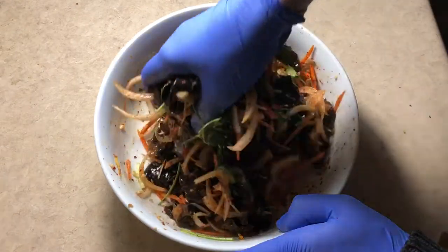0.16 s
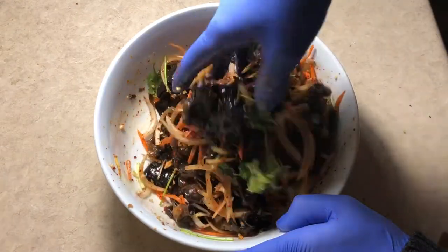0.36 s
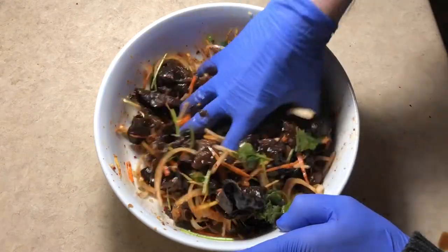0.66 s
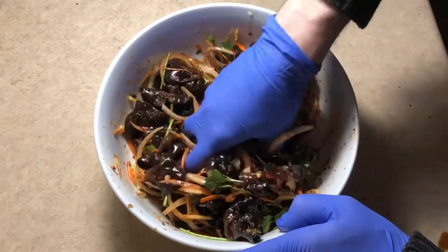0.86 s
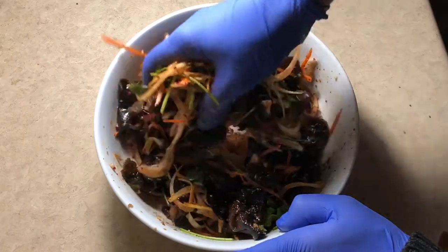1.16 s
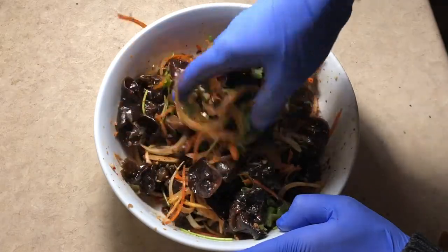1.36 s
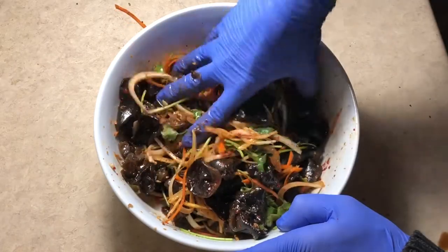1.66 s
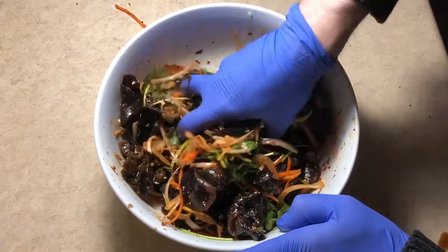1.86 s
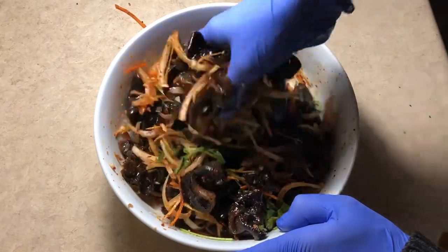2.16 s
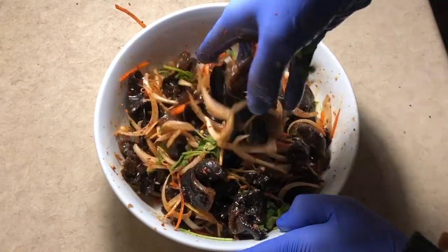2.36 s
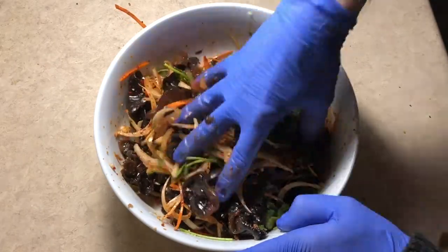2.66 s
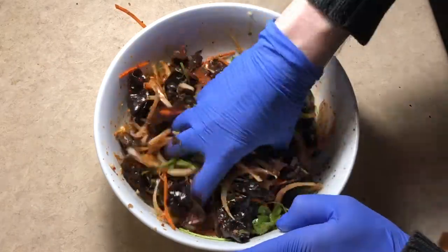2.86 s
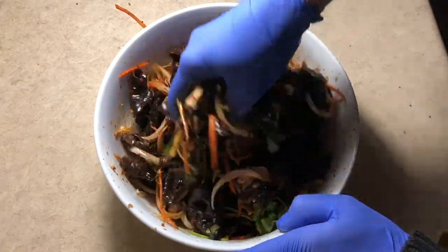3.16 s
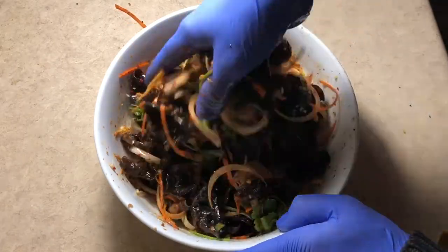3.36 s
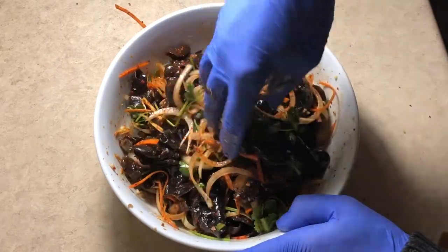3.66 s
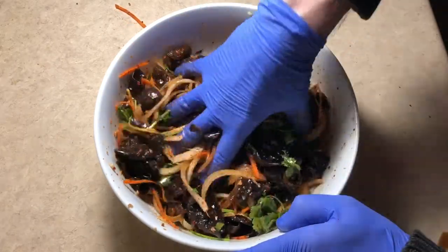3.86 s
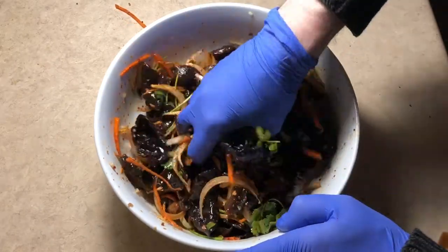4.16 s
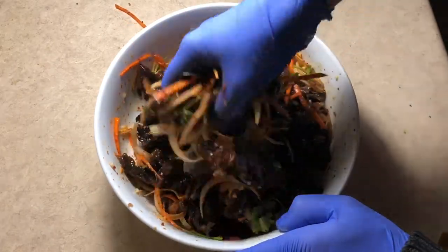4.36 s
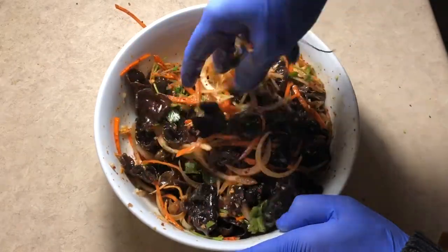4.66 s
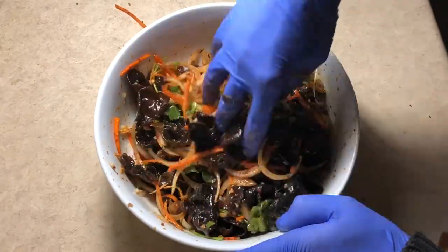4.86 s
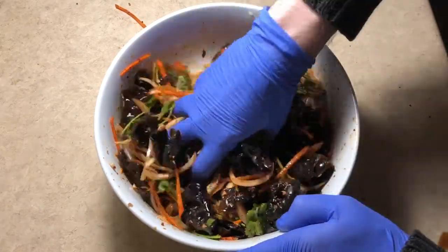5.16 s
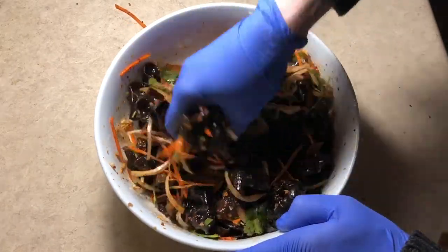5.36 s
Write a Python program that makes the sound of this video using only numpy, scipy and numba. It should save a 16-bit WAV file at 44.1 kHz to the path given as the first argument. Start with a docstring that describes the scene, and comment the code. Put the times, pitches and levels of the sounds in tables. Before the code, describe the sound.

Close, wet smacking and rustling of dressed salad being mixed by hand, with dull counter bumps and light ceramic taps.

```python
"""On a kitchen counter, a gloved hand squeezes and tosses a wet salad in a ceramic bowl, heard up close.
Dressing smacks and crackles as its films burst, leaves rustle, and the glove peels off them with ticks.
The push of the hand rumbles and thuds through the counter, and pieces tap the bowl into short rings.
One piece slaps down on the counter and a finger squeaks once on the glaze.
Underneath, slow air pressure sways in a quiet room."""
import sys
import numpy as np
from scipy import signal
from scipy.fft import rfft, irfft
from scipy.io import wavfile
from scipy.ndimage import uniform_filter1d
from numba import njit

SR = 44100
rng = np.random.default_rng(int(sys.argv[2]) if len(sys.argv) > 2 else 0)


def log_audio(samples):
    """Write samples as a 16-bit WAV file to the path given in sys.argv[1]."""
    # one column per channel
    frames = np.atleast_2d(samples).T
    # limit to full scale, then quantise
    limited = np.clip(frames, -1, 1)
    pcm = np.round(limited * 32767).astype(np.int16)
    wavfile.write(sys.argv[1], SR, pcm)


N = 242550
T = np.arange(N) / SR


def amp(db):
    """Turn decibels into a number to multiply by."""
    return 10 ** (np.asarray(db, float) / 20)


def unit(x):
    """Scale a sound so its average level (rms) is 1."""
    return x / np.sqrt(np.mean(x ** 2))


def curves(table):
    """Join the rows of a table with straight lines in time, giving one curve per value column."""
    times, *columns = np.transpose(table)
    return [np.interp(T, times, column) for column in columns]


def shaped_noise(points):
    """Noise whose balance of low and high follows (pitch [Hz], level [dB]) points."""
    hz, db = np.transpose(points)
    all_hz = np.arange(N // 2 + 1) * SR / N + 0.00089  # the tiny offset avoids log(0)
    gain = amp(np.interp(np.log(all_hz), np.log(hz), db, left=-90))
    return unit(irfft(rfft(rng.standard_normal(N)) * gain, N))


def band(x, lo_hz, hi_hz):
    """Keep the part of a sound between two pitches."""
    return signal.sosfilt(signal.butter(2, [lo_hz, hi_hz], "band", fs=SR, output="sos"), x)


def hiss(lo_hz, hi_hz):
    """Steady noise between two pitches."""
    return unit(band(rng.standard_normal(N), lo_hz, hi_hz))


def wobble(rate):
    """A curve that slides to a new random value, typically within 1 of zero, `rate` times a second."""
    step = int(SR / rate)
    held = np.repeat(rng.standard_normal(N // step + 1), step)
    return unit(uniform_filter1d(held, step)[:N])


def ring(x, notes):
    """An object shaken by x rings at its own notes; t60 is the time a note takes to fade by 60 dB."""
    out = 0
    for hz, db, t60 in notes:
        pole = np.exp(2j * np.pi * hz / SR - np.log(1000) / (t60 * SR))
        out = out + amp(db) * signal.lfilter([1], [1, -pole], x).imag
    return out


@njit
def pops(start, hz, cycles, size, glide):
    """Tiny tones that swell and fade over a few times `cycles`; `glide` makes the pitch rise."""
    out = np.zeros(N)
    for k in range(len(start)):
        span = cycles[k] * SR / hz[k]
        phase, step = 0., 2 * np.pi * hz[k] / SR
        for i in range(min(int(5 * span) + 2, N - start[k])):
            out[start[k] + i] += size[k] * min(4 * i / span, 1.) * np.exp(-i / span) * np.sin(phase)
            phase += min(step * (1 + glide * i / span), 2.6)
    return out


def swell(time, hold, db, rise_db_s, fall_db_s):
    """Loudness of moves that each rise, hold and fall; where they overlap, the loudest wins."""
    time, hold, db = (np.reshape(column, (-1, 1)) for column in (time, hold, db))
    before, after = np.maximum(time - T, 0), np.maximum(T - time - hold, 0)
    return amp(db - rise_db_s * before - fall_db_s * after).max(axis=0)


# The quiet room's balance of low and high: (pitch [Hz], relative level [dB])
ROOM_COLOUR = [(29, -12), (50, -1.5), (91, -16.5), (232, -28.5), (538, -28), (718, -28.5), (1590, -41),
               (2500, -58), (9360, -51), (15500, -60)]
def room_tone():
    """The room's faint, steady noise, mostly deep."""
    noise = shaped_noise(ROOM_COLOUR)
    return amp(-70.5) * noise / np.std(band(noise, 200, 15000))


# How deep the moving air is: (pitch [Hz], relative level [dB])
AIR_COLOUR = [(3, 13.5), (10, 5.5), (18, -7.5), (26, -8.5), (40, -27), (70, -35), (120, -65)]
# How strongly the air pressure sways: (time [s], level [dB])
AIR_SWAY = [(0.0, -30), (.31, -31), (.66, -26.5), (1.06, -31), (1.3, -29.5), (1.84, -27.5), (2.13, -27),
            (2.42, -32), (3.43, -31), (4.0, -28), (4.44, -27), (4.69, -35.5), (5.16, -28), (5.5, -35.5)]
def air():
    """Slow swings of air pressure, mostly too low to hear."""
    return amp(curves(AIR_SWAY)[0]) * shaped_noise(AIR_COLOUR)


def kitchen_echo(x, t60=0.3, echo_db=-23):
    """Hard walls add a short, dull echo to a sound."""
    t = T[:int(.4 * SR)]
    tail = band(rng.standard_normal(len(t)), 500, 5900) * amp(-60 * t / t60) * (t > .004)
    return x + amp(echo_db) * signal.fftconvolve(x, tail / np.sqrt(np.sum(tail ** 2)))[:N]


def groan():
    """The bowl's foot groans faintly and roughly against the counter."""
    return swell(time=3.21, hold=0.14, db=-69, rise_db_s=377, fall_db_s=307) * hiss(450, 500)


# The hand's squeezes and tosses: (time [s], hold [s], rustle [dB], high fizz [dB], rumble [dB])
GRIPS = [(0.0, 0.52, -75, -77.5, -61.5), (0.643, 0.037, -64, -65.5, -55), (0.776, 0.066, -57.5, -67.5, -49),
         (0.882, 0.04, -63, -68.5, -66), (1.214, 0.049, -64.5, -69.5, -61.5),
         (1.762, 0.18, -60.5, -66, -54.5), (2.228, 0.035, -71, -78, -60), (2.784, 0.2, -61, -65.5, -55.5),
         (3.248, 0.064, -71.5, -76, -62.5), (3.825, 0.14, -63, -66.5, -56.5),
         (3.993, 0.096, -57.5, -62.5, -52.5), (2.454, 0.032, -75, -77.5, -83),
         (3.415, 0.021, -77, -90, -80), (0.5, 0.06, -75, -76, -86), (1.014, 0.03, -73, -75, -80),
         (4.217, 0.068, -72.5, -77.5, -80), (4.43, 0.11, -72, -81, -72), (4.58, 0.02, -70.5, -81, -64.5),
         (4.903, 0.1, -65.5, -66, -76), (5.061, 0.2, -59, -64, -52), (5.434, 0.036, -67, -65, -85)]
def hand_effort():
    """How loud the rustle, fizz and rumble are as each grip comes and goes above a resting level."""
    time, hold, rustle_db, fizz_db, rumble_db = np.transpose(GRIPS)
    rustle = amp(-83) + swell(time, hold, rustle_db, rise_db_s=125, fall_db_s=100)
    fizz = amp(-79.5) + swell(time, hold, fizz_db, rise_db_s=125, fall_db_s=100)
    lean = amp(-97.5) + swell(time, hold, rumble_db, rise_db_s=146, fall_db_s=112)
    return rustle, fizz, lean


# The bowl is shoved against the counter: (time [s], hold [s], low rumble [dB], upper rumble offset [dB])
SHOVES = [(0.0, 0.0063, -61, -10), (0.348, 0.01, -50, -8), (0.39, 0.075, -52, -7), (0.684, 0.025, -45, -4),
          (0.792, 0.017, -50.5, -4.5), (1.037, 0.031, -55, -4.5), (1.348, 0.022, -61, 9.5),
          (1.655, 0.041, -49.5, -5.5), (1.787, 0.016, -47, -9), (1.884, 0.014, -56, -7),
          (2.077, 0.022, -61.5, -4.5), (2.29, .01, -58, -8), (2.451, 0.0081, -55.5, -6),
          (2.713, .01, -52.5, -7), (2.785, 0.012, -44, -5), (2.838, 0.036, -48.5, -3),
          (2.989, 0.021, -58, -2), (3.207, 0.22, -72, 0), (3.793, 0.025, -61, -18), (4, 0.12, -52, -2.5),
          (4.538, 0.017, -56.5, -1), (5.048, 0.045, -46, -3.5), (5.12, 0.065, -41, -5.5)]
def bowl_push(lean):
    """How loud the low and upper rumble are: the hand leans on the bowl and shoves jolt it."""
    time, hold, db, upper_db = np.transpose(SHOVES)
    low_jolts = swell(time, hold, db, rise_db_s=377, fall_db_s=307)
    upper_jolts = swell(time, hold, db + upper_db, rise_db_s=377, fall_db_s=307)
    return np.hypot(lean, low_jolts), np.hypot(amp(-5) * lean, upper_jolts)


# The notes the counter rings at: (pitch [Hz], relative level [dB], fade time [s])
COUNTER_NOTES = [(42, 3, 0.14), (100.7, 1.5, 0.054), (171.4, -5.5, 0.095), (206, -17, 0.057),
                 (283.3, 0, 0.028), (373.6, -11.5, 0.034), (475.5, -6.5, 0.021), (783, -19.5, 0.072),
                 (1006, -23, 0.078)]
# Blows on the counter: (time [s], strength [dB], contact time [s], extra weight behind the blow [dB])
THUDS = [(0.346, -29, 0.004, 0.5), (0.368, -38, 0.0088, 14.5), (0.684, -29.5, 0.00098, -6.5),
         (0.783, -29, 0.0054, 0), (1.347, -41, 0.0069, -2), (1.665, -38, 0.0058, -0.5),
         (1.769, -45.5, 0.0069, 11.5), (2.457, -45, 0.006, 13.5), (2.777, -32.5, 0.0038, -25),
         (2.788, -37, 0.0012, -13), (2.834, -38, 0.00079, -19), (2.85, -39, 0.0012, -14),
         (2.23, -54, 0.00073, -20), (3.998, -41.5, 0.0031, 3.5), (4.02, -51, 0.0006, -20),
         (4.524, -44.5, 0.0058, -21), (5.049, -43, 0.0016, -21), (5.118, -34, 0.0027, -6),
         (5.129, -31.5, 0.0025, -21), (5.162, -32, 0.0018, -18), (5.174, -33, 0.0049, -24)]
def counter(lean):
    """Soft blows make the counter thud, and the uneven drag of the bowl's foot makes it rumble."""
    light, heavy = np.zeros(N), np.zeros(N)
    for time, db, contact, weight_db in THUDS:
        push = np.hanning(int(contact * SR))  # a softer contact pushes longer
        i = int(time * SR)
        light[i:i + len(push)] += amp(db) * push / push.sum()
        heavy[i:i + len(push)] += amp(db + weight_db) * push / push.sum()
    # weight bends the whole slab, which rings at its two lowest notes
    thuds = ring(heavy, COUNTER_NOTES[:2]) + ring(light, COUNTER_NOTES[2:])
    drag = rng.standard_normal(N) * amp(2.2 * wobble(65))
    slab = ring(drag, COUNTER_NOTES)
    low = unit(band(slab, 110, 243.4)) + amp(1) * unit(band(slab, 54.3, 100.2))
    upper = unit(band(slab + 0.93 * drag, 297, 1610))
    low_gain, upper_gain = bowl_push(lean)
    return thuds + low_gain * low + upper_gain * upper


# The notes the bowl rings at: (pitch [Hz], relative level [dB], fade time [s])
BOWL_NOTES = [(664, 0, .2), (802, -10, .09), (1655, -2, .3), (1720, -3, .07), (2420, -6, .1),
              (2925, 3, .26), (4425, 9, .09), (6900, 4, .05)]
# Pieces tap the bowl; where and how hard they land favours the notes near one pitch:
# (time [s], level [dB], favoured pitch [Hz], drop away from it [dB per octave], free ringing [s])
BOWL_TAPS = [(.161, -64, 700, 5, 0.04), (.214, -54, 760, 9, 0.04), (.318, -59, 700, 13, 0.032),
             (.374, -42.5, 660, 10.5, 0.088), (.43, -52, 660, 15, 0.025), (1.091, -63, 1800, 15, 0.05),
             (1.165, -59, 2370, 42, 0.027), (1.196, -59, 720, 10, 0.025), (1.319, -55, 2300, 51, 0.024),
             (2.093, -60, 664, 9, 0.02), (2.104, -55, 664, 11, 0.06), (2.106, -57, 1750, 26, 0.011),
             (2.149, -66, 1600, 15, .03), (4.315, -59, 2350, 70, .03), (4.597, -57.5, 2380, 60, 0.016),
             (4.713, -72, 2900, 40, 0.02)]
def bowl(rustle_gain, rise_s=.003, muffled_t60=.05):
    """Each soft tap rings the ceramic until salad slumps on its wall; rustling keeps it faintly ringing."""
    taps, t = np.zeros(N), T[:int(.3 * SR)]
    hz, note_db, t60 = np.transpose(BOWL_NOTES)[:, :, None]
    flutter = amp(2.5 * np.array([wobble(90) for _ in BOWL_NOTES]))  # brushing leaves make notes waver
    for time, db, favoured_hz, drop_db, free_s in BOWL_TAPS:
        start_db = note_db - drop_db * np.abs(np.log2(hz / favoured_hz))
        tones = np.minimum(t / rise_s, 1) * amp(start_db - 60 * t / t60) * np.sin(2 * np.pi * hz * t)
        gain = amp(db - 60 * np.maximum(t - free_s, 0) / muffled_t60)
        i = int(time * SR)
        taps[i:i + len(t)] += gain * (tones * flutter[:, i:i + len(t)]).sum(axis=0)
    even_notes = [(pitch, 0, fade) for pitch, _, fade in BOWL_NOTES[:5]]
    brushed = unit(ring(rng.standard_normal(N), even_notes))
    return taps + amp(-13) * rustle_gain * brushed


# The path of one finger squeak: (time [s], pitch [Hz], level [dB])
SQUEAK_PATH = [(5.08, 752, -67), (5.088, 747, -55), (5.114, 655, -48.5), (5.14, 650, -52)]
def glove_squeak():
    """Rubber slips on wet glaze with a short, falling tone."""
    hz, db = curves(SQUEAK_PATH)
    slipping = (T > SQUEAK_PATH[0][0]) & (T < SQUEAK_PATH[-1][0])
    gain = uniform_filter1d(slipping.astype(float), 300) * amp(db)
    shaky_hz = hz * (1 + 0.015 * wobble(200))
    return gain * np.sqrt(2) * np.sin(2 * np.pi * np.cumsum(shaky_hz) / SR)


def slap(time=1.3458, db=-38, rise_s=0.0012, crack_t60=0.059, tail_t60=0.36):
    """A thrown piece hits the counter with a dull crack whose lower part hangs on in the hard surface."""
    t = np.maximum(T - time, 0)
    crack = amp(-60 * t / crack_t60) * hiss(550, 2040)
    tail = amp(-13 - 60 * t / tail_t60) * hiss(450, 1950)
    return np.minimum(t / rise_s, 1) * amp(db) * (crack + tail)


def snap(time=.3465, hz=4200., cycles=1.5):
    """A crisp piece breaks with one sharp click."""
    click = pops(np.array([int(time * SR)]), np.array([hz]), np.array([cycles]), amp([-26]), glide=0.)
    return band(band(click, 2900, 12000), 2900, 12000)


# The wet salad's balance of low and high: (pitch [Hz], relative level [dB])
SALAD_COLOUR = [(1000, -9.5), (1900, -0.5), (2700, -10), (3600, 0.5), (5100, 0.5), (6500, -6), (8700, 3.5),
                (11000, -4), (14500, -13)]
def crackle(per_second, lo_hz, hi_hz, cycles, scatter_db, glide=.015):
    """Films of dressing burst at random moments; a few are far louder than the rest."""
    when, pitch, strength, length = rng.random((int(per_second * N / SR), 4)).T
    hz = lo_hz * (hi_hz / lo_hz) ** pitch
    colour_hz, colour_db = np.transpose(SALAD_COLOUR)
    db = np.minimum(-scatter_db * np.log(strength), 12)
    db += np.interp(np.log(hz), np.log(colour_hz), colour_db)
    return unit(pops((when * N).astype(np.int64), hz, cycles * (.5 + length), amp(db), glide))


def wet_leaves(rustle_gain, fizz_gain):
    """Squeezed leaves give dense fizz, sparser pops and a smooth squish, with a fine glove crinkle."""
    low = crackle(6000, 800, 6000, cycles=1.6, scatter_db=1.8, glide=.02)
    low += amp(-6) * crackle(300, 1500, 6000, cycles=5, scatter_db=3.2)
    squish = amp(-4 + 2 * wobble(40)) * shaped_noise(SALAD_COLOUR[:5] + [(8000, -35)])
    middle = crackle(3000, 5500, 10000, cycles=2.5, scatter_db=2)
    middle += amp(-3) * crackle(250, 5500, 10000, cycles=6, scatter_db=3.5)
    high = crackle(2500, 10000, 15500, cycles=3.5, scatter_db=2.5)
    high += amp(-2) * crackle(150, 10000, 15500, cycles=4, scatter_db=3.5)
    fizz = unit(amp(3 * wobble(45)) * middle + amp(4.1 * wobble(60) - 3) * high)  # each flickers alone
    crinkle = crackle(160, 11000, 15500, cycles=1.2, scatter_db=3, glide=.01)
    crinkle = amp(-10) * unit(band(crinkle, 10500, 18000))
    flicker = amp(2.5 * wobble(24.967))
    return flicker * (rustle_gain * unit(low + squish) + fizz_gain * (fizz + crinkle))


# The loudest sticky ticks: (time [s], level [dB], pitch [Hz])
STICKY_TICKS = [(0.2623, -38.5, 11200), (0.555, -42, 9710), (0.7791, -36, 10600), (0.842, -50, 13000),
                (0.94, -44, 13000), (1.04, -48, 11500), (1.1355, -38, 10200), (1.1598, -44, 10700),
                (1.1772, -48, 9900), (1.3124, -44, 10700), (1.3397, -41, 9390), (1.6728, -33.5, 5300),
                (1.8617, -50, 10900), (1.8916, -51, 11200), (1.9405, -44, 12100), (1.954, -38, 10600),
                (2.077, -42, 14000), (2.0066, -33.5, 10700), (2.304, -35.5, 12600), (2.3475, -42, 12000),
                (2.262, -47, 12500), (2.318, -53, 12500), (1.19, -46, 12500), (2.4565, -37, 10500),
                (2.722, -35, 11700), (2.905, -35, 9100), (2.9407, -43, 10600), (2.9741, -39, 10400),
                (3.27, -48, 13500), (3.304, -50, 11000), (3.352, -47, 11500), (3.401, -49, 14000),
                (3.452, -47, 8800), (3.486, -48, 9000), (3.863, -33, 10000), (3.972, -42, 11000),
                (4.248, -48, 13900), (4.651, -44, 14200), (4.907, -43, 11600), (5.0444, -52, 10500),
                (5.0873, -49, 9100), (5.2131, -51, 9000)]
def sticky_ticks(fizz_gain, cycles=2.4):
    """Glove and leaves peel apart in high ticks, with smaller ones at random while the hand works."""
    time, db, hz = np.transpose(STICKY_TICKS)
    loud = pops((time * SR).astype(np.int64), hz, np.full(len(time), cycles), amp(db), glide=.012)
    small = crackle(110, 5500, 14500, cycles=2.5, scatter_db=3, glide=.01)
    return loud + amp(-6) * fizz_gain * small


# The pitch ranges of a smack: (low edge [Hz], high edge [Hz], relative level [dB], fade stretch [times])
SMACK_RANGES = [(856, 2420, -4.5, 2.2), (2420, 5800, 0, 1.2), (5800, 10000, -4.5, 1.5),
                (10000, 15000, -7, 1.1)]
# Wet smacks: (time [s], level [dB], tone pitch [Hz], brightness [dB per octave], base fade time [s])
# In the brightest smacks the high hiss is heard, not this tone.
WET_SMACKS = [(0.106, -43.5, 4570, 4, 0.016), (0.127, -49, 9200, 2, 0.016), (0.154, -46.5, 3400, 2, 0.018),
              (0.199, -42.5, 9700, -1, 0.13), (0.372, -40.5, 4330, -14, 0.027),
              (0.4034, -43, 5000, 2, 0.037), (0.4904, -50, 7500, 8.5, 0.053),
              (0.5595, -39.5, 4800, 2.5, 0.019), (0.599, -43, 1800, 12, 0.032),
              (0.643, -41.5, 1890, 6, 0.17), (0.7784, -48, 2030, -3, 0.027),
              (0.891, -45.5, 2480, -1, 0.053), (0.9468, -40, 3400, 1, 0.032),
              (1.0675, -44.5, 4950, -1, 0.025), (1.1457, -41.5, 7600, 1, 0.047),
              (1.162, -44, 5100, 4, 0.048), (1.1863, -40, 1890, 3, 0.04), (1.226, -38, 6600, 1.5, 0.02),
              (1.234, -41, 4500, 4, 0.02), (1.244, -39, 4900, 4.5, 0.033), (1.107, -49, 4520, -2, 0.015),
              (1.193, -43, 4340, -6, 0.015), (1.283, -43, 4950, -3, 0.023), (1.591, -43, 2120, 8, 0.078),
              (1.668, -28.5, 8560, -7, 0.063), (1.7763, -41, 2100, -7.5, 0.14),
              (1.8575, -38.5, 1930, 3, 0.22), (1.892, -38, 1730, 3, 0.054), (1.983, -44, 3150, 0, 0.033),
              (2.006, -33.5, 1820, 5.5, 0.068), (2.0467, -44, 7030, 6, 0.057), (2.072, -45, 6200, 4, 0.02),
              (2.148, -45, 3860, 9, 0.039), (2.226, -48, 4070, -10, 0.016), (2.238, -50, 9050, 6, 0.02),
              (2.277, -63, 2500, -3, 0.02), (2.295, -50.5, 2500, -7.5, 0.015),
              (2.3385, -49, 3000, -10, 0.012), (2.531, -53, 7000, 0, 0.02),
              (2.4284, -49.5, 4900, -9, 0.058), (2.456, -49.5, 5000, -3, 0.079),
              (2.49, -42.5, 9600, 1.5, 0.064), (2.7227, -51, 11500, 0.5, 0.06),
              (2.7883, -39.5, 1830, 13, 0.02), (2.8382, -32.5, 5250, -1.5, 0.098),
              (2.8643, -30, 1925, 4, 0.13), (2.9206, -38.5, 2010, -7.5, 0.057),
              (2.967, -47, 2100, -7, 0.098), (2.992, -33, 1840, 0.5, 0.064), (3.1515, -42, 5000, 0, 0.023),
              (3.16, -40.5, 3700, -3, 0.049), (3.248, -48, 5300, 2, 0.015), (3.634, -51, 5000, 2, 0.02),
              (3.689, -48, 4600, -2, 0.017), (3.258, -45, 5500, 3, 0.02), (3.419, -49, 6500, -1, 0.02),
              (3.543, -43.5, 8300, 4, 0.033), (3.759, -47, 4330, -3, 0.023), (3.798, -49, 8000, 3, 0.025),
              (3.8519, -35, 1690, 2, 0.042), (3.8599, -35, 6240, 3, 0.063), (3.902, -39, 5830, -1, 0.03),
              (3.9557, -36.5, 4920, 4, 0.052), (4.014, -39, 6930, 2.5, 0.034), (4.06, -36, 5460, -6, 0.029),
              (4.193, -44.5, 5500, 3, 0.074), (4.2377, -38, 4800, -3, 0.048), (4.277, -52, 9750, 0, 0.018),
              (4.2918, -36, 2600, 3, 0.04), (4.317, -48, 4800, -3, 0.032), (4.328, -44, 4740, 1, 0.035),
              (4.345, -47, 4800, -3, 0.019), (4.376, -50, 8000, 2, 0.023), (4.386, -44.5, 5370, 5, 0.031),
              (4.4053, -45, 4700, 5, 0.03), (4.413, -45, 3500, 3, 0.053), (4.428, -48, 7800, -3, 0.022),
              (4.464, -44.5, 6500, -5, 0.05), (4.485, -43, 9500, -2, 0.021), (4.565, -53, 4600, -2, 0.017),
              (4.6269, -47, 4500, 1, 0.021), (4.637, -50, 4930, 2, 0.018), (4.946, -45.5, 4050, 1, 0.055),
              (4.969, -46, 7900, -2, 0.024), (5.001, -36.5, 5180, -2, 0.058), (5.09, -32.5, 8870, -3, 0.2),
              (5.1583, -32, 1910, 2.5, 0.051), (5.2205, -38, 5000, -6, 0.038),
              (5.232, -38.5, 4850, -1, 0.052), (5.299, -41, 4600, 5, 0.045), (5.3777, -45, 4330, 5, 0.028),
              (5.386, -47, 9050, 2, 0.015), (5.449, -41.5, 4440, 2, 0.058)]
def smacks(rise_s=.0008, click_t60=.01, pivot_hz=4000, focus_db_per_octave=9):
    """A film of dressing tears with a click, a short tone and a rough burst of hiss."""
    time, db, hz, brightness, t60 = np.transpose(WET_SMACKS)
    start = (time * SR).astype(np.int64)
    cycles = .5 * t60 * hz / np.log(1000)  # the tone dies in half the base fade time
    size = amp(db - 15 + brightness * np.log2(hz / pivot_hz))
    detune = 1 + .04 * rng.standard_normal((len(time), 3)).T  # three close pitches sound together
    out = sum(pops(start, hz * ratio, cycles, size, glide=.028) for ratio in detune)
    for lo_hz, hi_hz, range_db, stretch in SMACK_RANGES:
        centre_hz = np.sqrt(lo_hz * hi_hz)
        colour_db = brightness * np.log2(centre_hz / pivot_hz)
        colour_db -= focus_db_per_octave * np.abs(np.log2(centre_hz / hz))
        gains = amp(db + range_db + colour_db - 12.5)  # noise peaks about 12.5 dB above its average
        loudness = np.zeros(N)
        for i, gain, fade_s in zip(start, gains, t60 * stretch):
            t = T[:min(int(fade_s * SR), N - i)]
            burst, click = amp(-60 * t / fade_s), amp(-2 - 60 * t / click_t60)
            loudness[i:i + len(t)] += gain * np.minimum(t / rise_s, 1) * (burst + click)
        out += loudness * hiss(lo_hz, hi_hz) * amp(0.47 * wobble(500))
    return out


def scene():
    """Mix everything into one channel; only the brighter sounds get the kitchen's echo."""
    rustle_gain, fizz_gain, lean = hand_effort()
    salad = wet_leaves(rustle_gain, fizz_gain) + smacks() + sticky_ticks(fizz_gain) + snap()
    contacts = bowl(rustle_gain) + glove_squeak() + slap()
    near = kitchen_echo(salad + contacts) + counter(lean) + groan()
    return (near + air() + room_tone())[None]


def record(dry, top_hz=15780):
    """Cut the very highest treble steeply; the filter starts settled, so it adds no opening click."""
    sos = signal.ellip(12, .2, 70, top_hz, fs=SR, output="sos")
    settled = signal.sosfilt_zi(sos)[:, None] * dry[None, :, :1]
    return signal.sosfilt(sos, dry, zi=settled)[0]


dry = scene()
out = record(dry)
log_audio(out)
```